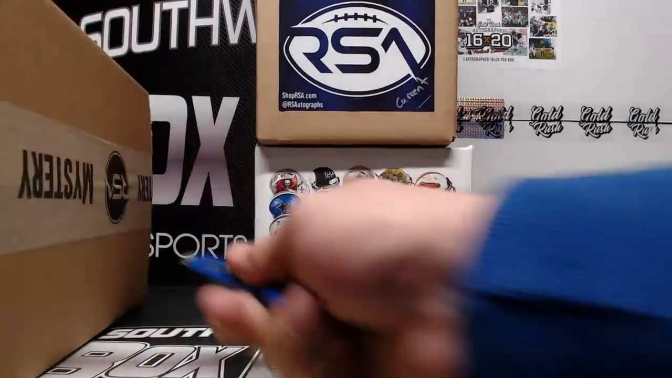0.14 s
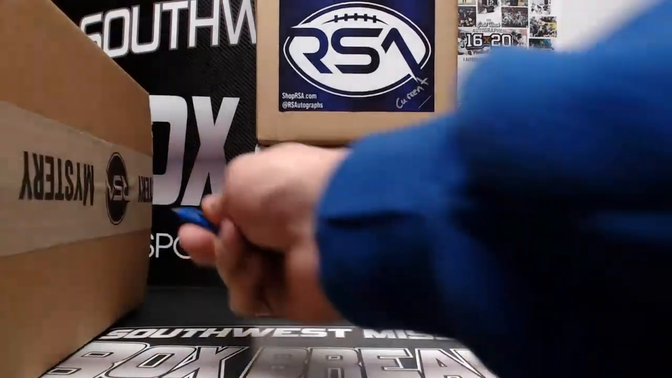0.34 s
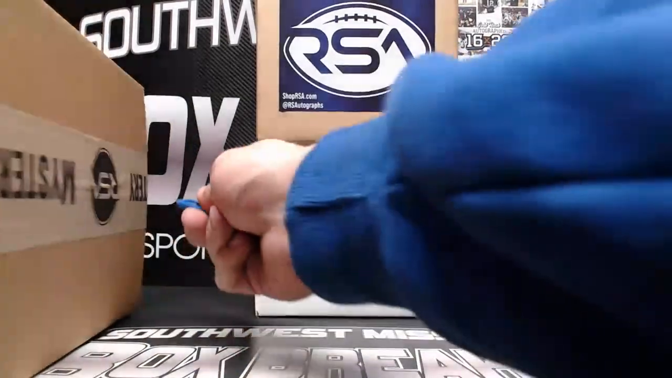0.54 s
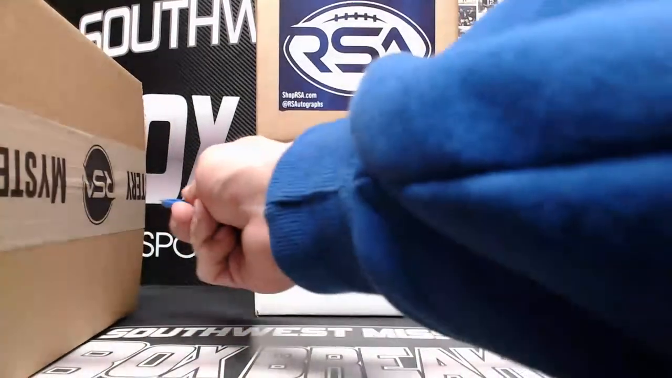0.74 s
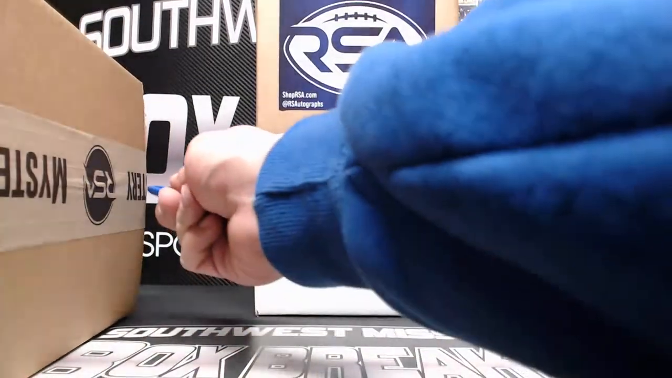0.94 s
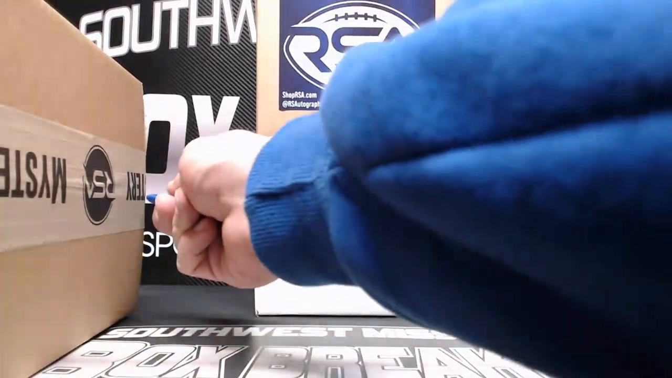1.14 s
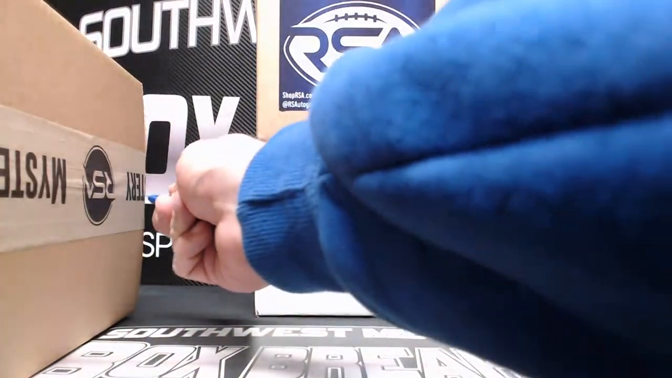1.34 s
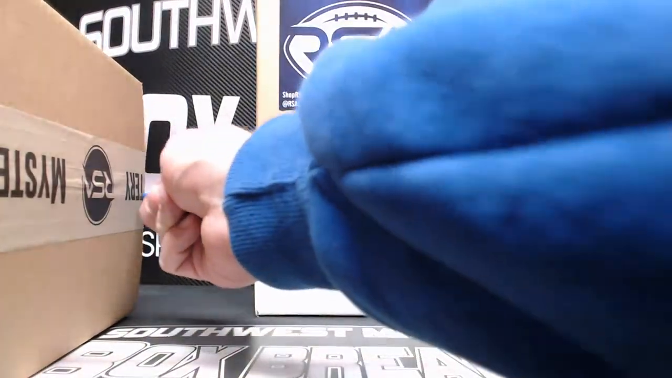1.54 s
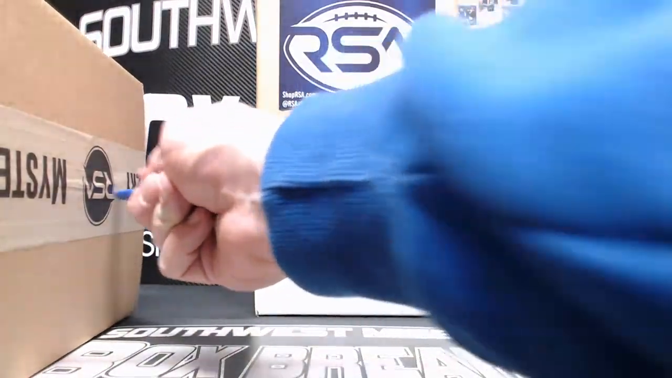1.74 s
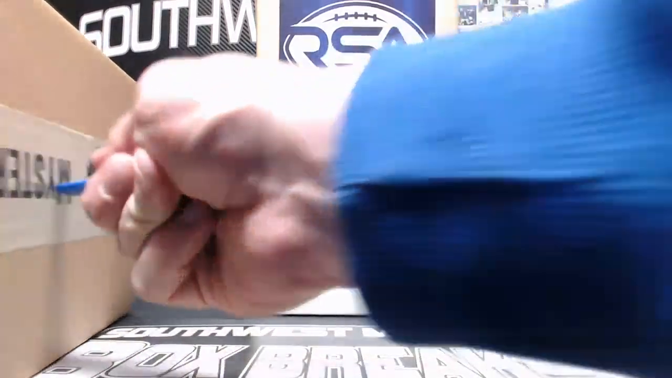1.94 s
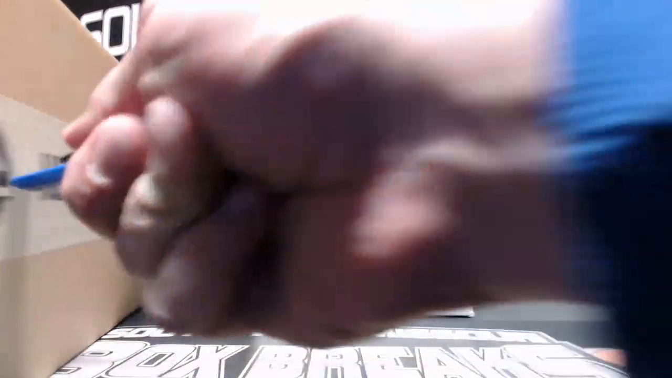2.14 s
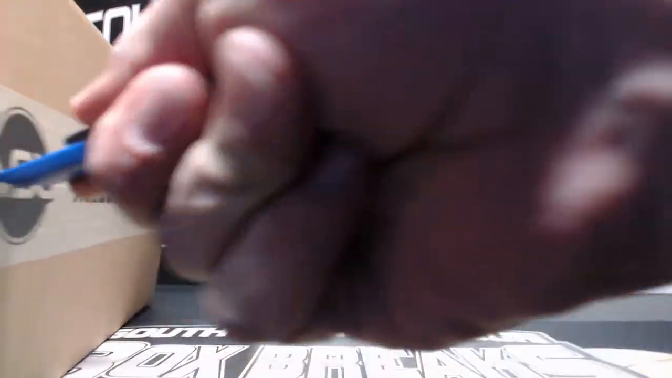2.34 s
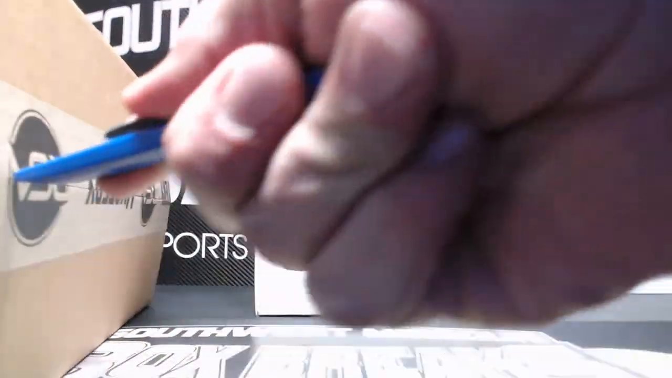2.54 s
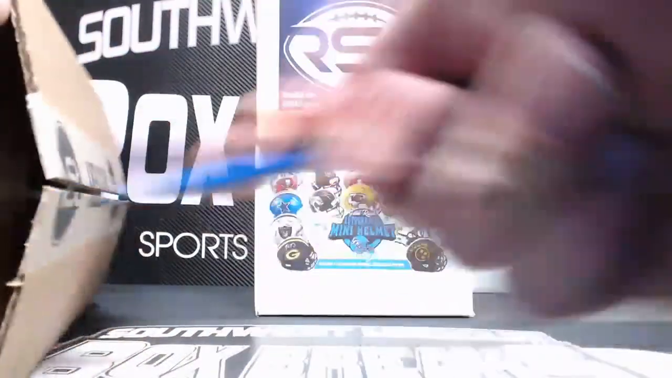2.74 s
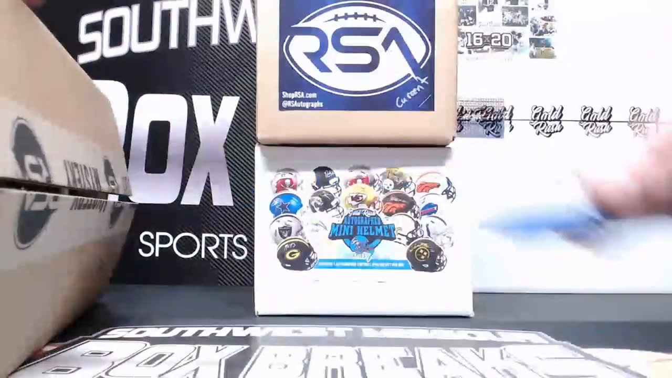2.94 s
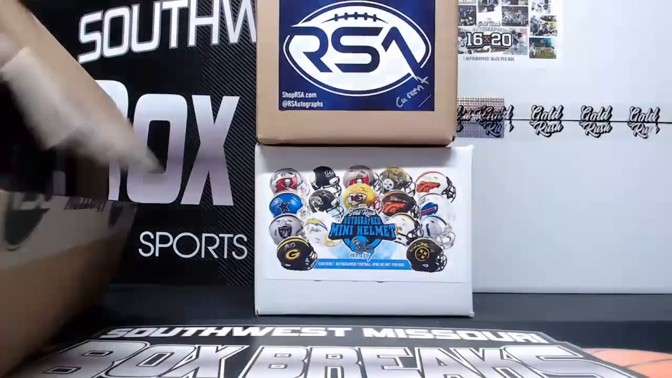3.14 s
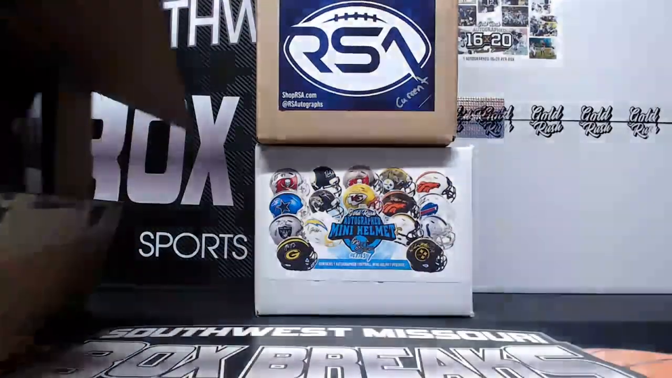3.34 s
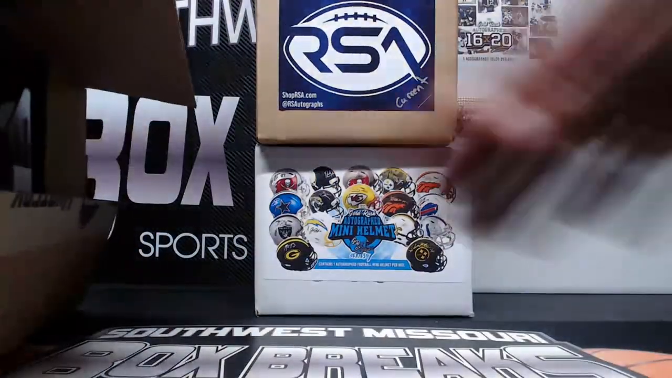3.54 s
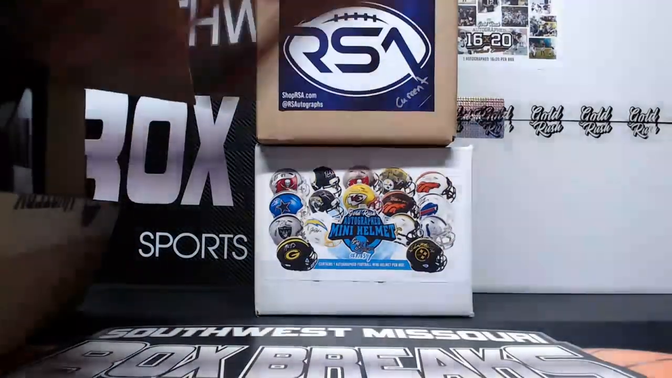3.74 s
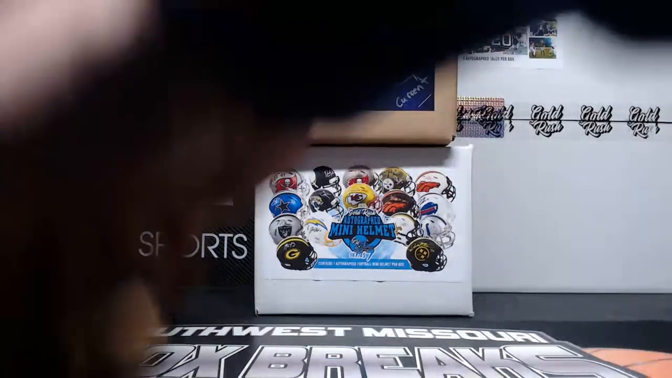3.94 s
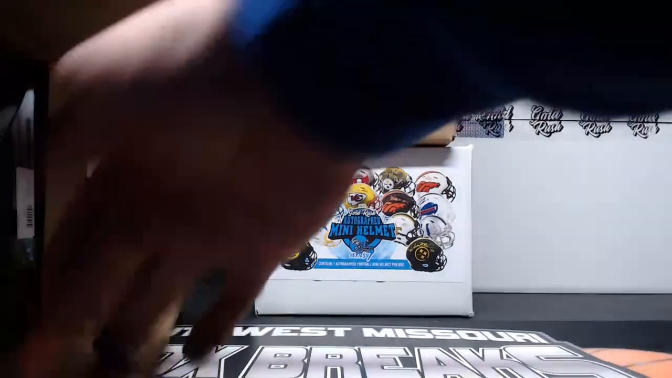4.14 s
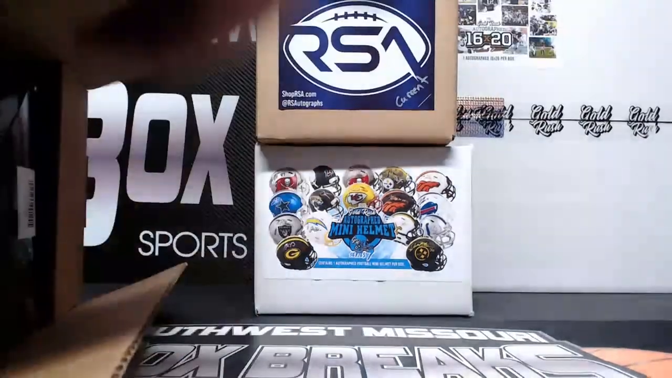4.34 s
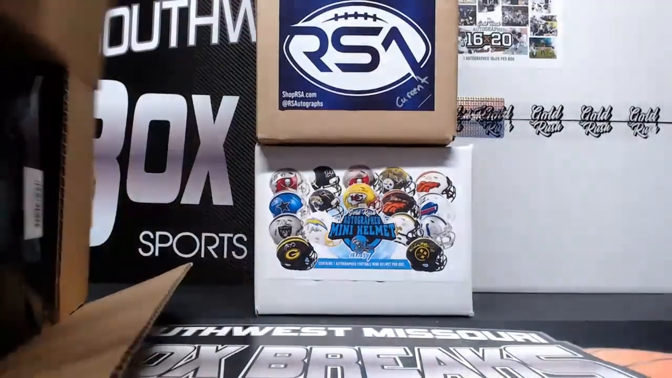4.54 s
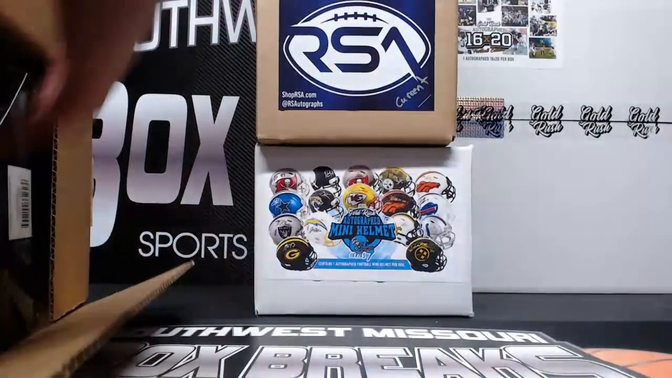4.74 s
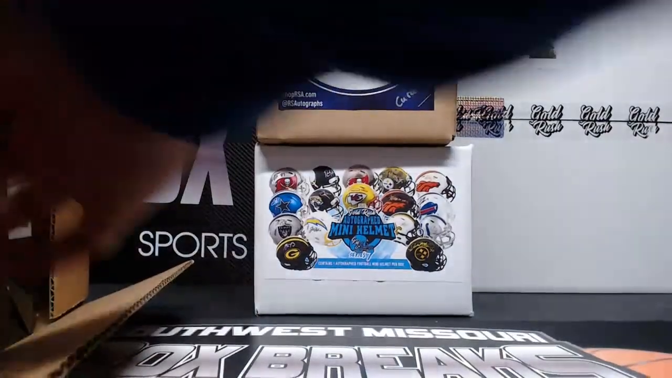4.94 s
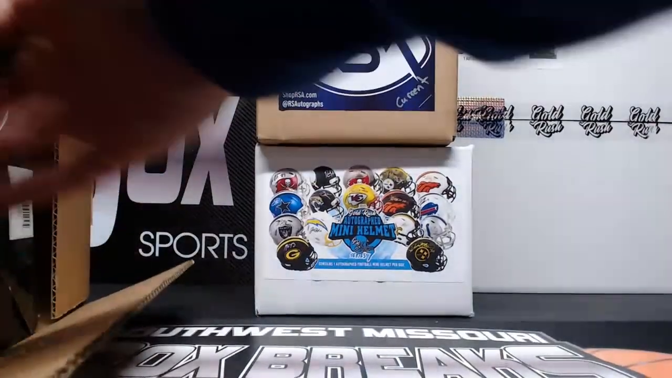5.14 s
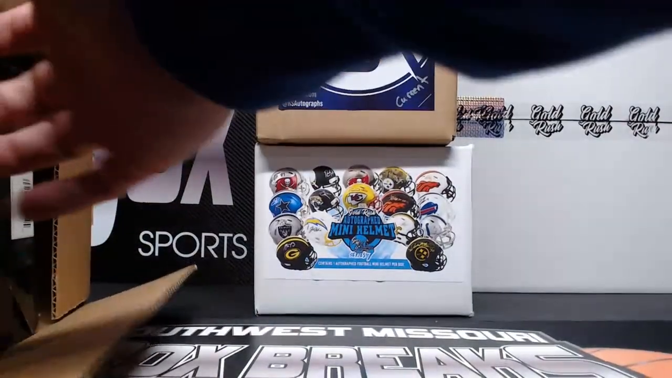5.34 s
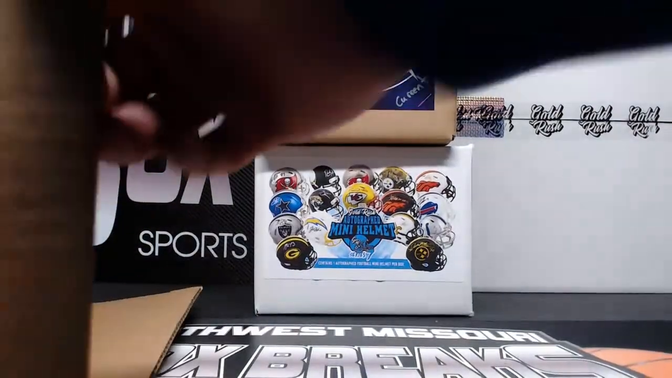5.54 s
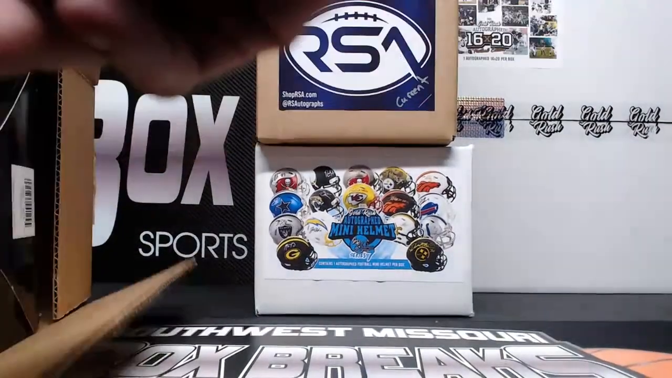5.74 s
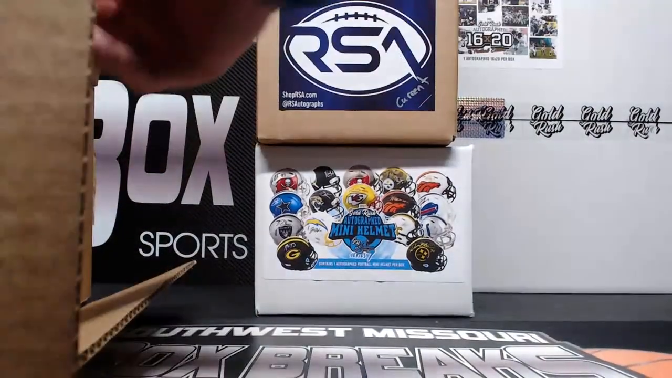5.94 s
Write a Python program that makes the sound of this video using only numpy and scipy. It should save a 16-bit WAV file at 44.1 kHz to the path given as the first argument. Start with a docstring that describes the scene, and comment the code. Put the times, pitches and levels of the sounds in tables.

```python
"""A blade slits the tape of an empty-sounding cardboard box close to a mono microphone; then hands pull the flaps open.
Blade and fingers are patchy noise in five layers: hiss, scrape, rasp, hollow and walls, driven by stroke curves.
Fibres and glue crack in short coloured bursts; knocks ring the hollow and thud in the walls.
Loose flaps ring as decaying sines, and some rubs make a panel sing as narrow noise.
The recorder's noise gate shuts in the pauses."""
import sys
import numpy as np
from scipy import signal
from scipy.fft import rfft, irfft, next_fast_len
from scipy.io import wavfile
from scipy.ndimage import uniform_filter1d, map_coordinates

SR = 44100
rng = np.random.default_rng(int(sys.argv[2]) if len(sys.argv) > 2 else 0)


def wav_out(sig):
    """Save sig, one row per channel (or a flat mono array), as 16-bit PCM at SR to the path in sys.argv[1]."""
    wavfile.write(sys.argv[1], SR, np.round(np.clip(np.atleast_2d(sig).T, -1, 1) * 32767).astype(np.int16))


N = 268288

# modes of the cardboard panels: (frequency [Hz], width [Hz], level [dB])
WALL_MODES = [(137.6, 71, -3.5), (209.8, 29.6, 6), (288.5, 80, 1.5), (513, 266, 0)]


def amp(db):
    """Gain of a level in dB."""
    return 10 ** (np.asarray(db) / 20)


def unit(x):
    """x at rms 1."""
    return x / np.sqrt(np.mean(x ** 2) + 1e-20)


def filtered(x, response):
    """x times a complex response of frequency."""
    m = next_fast_len(len(x) + SR // 4)
    spectrum = rfft(x, m) * response(np.fft.rfftfreq(m, 1 / SR))
    return irfft(spectrum, m)[:len(x)]


def colour(points):
    """Response through (Hz, dB) points on a log axis: cut below the first, level above the last."""
    f, db = np.transpose(points)
    return lambda hz: amp(np.interp(np.log(hz + 1), np.log(f + 1), db, left=-120))


def resonances(modes):
    """Causal response of (Hz, width in Hz, dB) modes, summed with alternating sign."""
    def response(f):
        total = 0
        for k, (centre, width, db) in enumerate(modes):
            damping = 1j * f * width
            total = total + (-1) ** k * amp(db) * damping / (centre * centre - f * f + damping)
        return total
    return response


def wobble(rate):
    """A smooth random curve, rate knots a second."""
    knots = rng.standard_normal(int(N * rate / SR) + 4)
    return map_coordinates(knots, [np.arange(N) * rate / SR])


def grit(lumps_db, lumps_rate, patchy_db):
    """Friction noise: uneven in strength, with patches of random gain over time and frequency."""
    z = signal.stft(rng.standard_normal(N + 1024), nperseg=512)[2]
    field = uniform_filter1d(rng.standard_normal(z.shape), size=3, axis=0)  # across frequency
    field = uniform_filter1d(field, size=14, axis=1)  # across time
    noise = signal.istft(z * amp(patchy_db * unit(field)), nperseg=512)[1][:N]
    return noise * amp(lumps_db * wobble(lumps_rate))


def swell_db(ms, rise, hold, fall):
    """Level curve of a brief sound: up to full level at 0 ms, held, then down, straight in dB."""
    fade_db = 20  # gained or lost over one rise or fall time
    return fade_db * np.minimum(0, np.minimum(ms / max(rise, 1), (hold - ms) / max(fall, 1)))


def singing():
    """Rubs that make one panel sing: friction noise caught in one resonance, swelling and fading."""
    # (start of full level [s], rise [ms], hold [ms], fall [ms], level [dB], centre [Hz],
    #  nominal width [Hz], reshaped by the filter below)
    sung_rubs = [(1.736, 69, 46, 25, -34, 2130, 200), (1.575, 12, 94, 100, -50, 4620, 360),
                 (1.605, 18, 160, 43, -48.5, 7600, 330), (4.76, 70, 42, 66, -44.5, 1030, 800),
                 (4.9, 100, 85, 15, -42, 1290, 460), (.08, 25, 70, 40, -44.5, 127, 34),
                 (5.02, 7.2, 26, 8, -31.5, 2080, 210), (5.678, 62, 21, 8, -21, 3160, 1400)]
    out = np.zeros(N)
    noise = grit(lumps_db=2, lumps_rate=80, patchy_db=1.5)
    ms = np.arange(N) / SR * 1000
    for s, rise, hold, fall, db, hz, width in sung_rubs:
        panel = resonances([(hz, 1.16 * width, 0)])
        tone = unit(filtered(noise, lambda f: panel(f) ** 2))
        out += amp(db + swell_db(ms - s * 1000, rise, hold, fall)) * tone
    return out


def flap():
    """Sharp knocks ring a loose flap's modes as decaying sines, each at a new strength and pitch."""
    # (time [s], level [dB] that scales the modes)
    hits = [(.127, -43), (.416, -50), (1.55, -38.5), (2.689, -23), (2.903, -27), (3.668, -24.5),
            (3.709, -33.5), (3.903, -33), (5.039, -25), (5.055, -27), (5.076, -16), (5.335, -21),
            (5.903, -16.5)]
    # modes of the flap before their random spread: (pitch [Hz], level [dB], 60 dB decay time [s])
    flap_modes = [(1404, -7.5, 0.06), (1937, 1.5, 0.033), (2287, 9.5, 0.015), (2940, -10, 0.025)]
    out = np.zeros(N + SR)
    t = np.arange(SR // 10) / SR
    for s, db in hits:
        ring = np.zeros(len(t))
        for hz, level, t60 in flap_modes:
            decay = amp(level + rng.normal(0, 1.5) - 60 * t / t60)
            ring += decay * np.sin(2 * np.pi * hz * rng.normal(1, 0.051) * t)
        onset = 1 - np.exp(-t / 0.0013)
        out[round(s * SR):][:len(t)] += amp(db) * onset * ring
    return out[:N]


def knocks():
    """Each knock rings the hollow for a few cycles, roughened by its neighbouring modes, and thuds in the walls."""
    # (time [s], ring level before make-up [dB], hollow pitch [Hz],
    #  wall thud over the ring level, before make-up [dB])
    blows = [(0.127, -22, 704, -20), (0.156, -28.5, 784, -20), (.181, -39, 790, -20),
             (0.336, -49.5, 262, -31.5), (0.402, -32.5, 264, -15), (0.416, -28, 585, -6),
             (0.426, -28, 202, -14), (1.18, -40, 654, -8), (1.55, -20.5, 750, -18), (1.674, -21, 656, -10),
             (1.97, -30.5, 730, 9), (2.083, -18, 514, 4), (2.182, -24, 750, -4), (2.318, -24, 750, -30),
             (2.348, -29, 684, 4), (2.642, -28.5, 750, -35), (2.689, -16.5, 734, -8.5),
             (2.903, -26, 723, -14), (3.372, -36, 567, 10), (3.482, -27.5, 744, -4), (3.521, -28, 670, -16),
             (3.563, -28.5, 554, 2), (3.606, -31.5, 570, -4), (3.667, -16.5, 712, -40),
             (3.711, -31.5, 680, -22), (3.734, -28.5, 605, -3), (3.773, -29, 680, -4),
             (3.783, -22.5, 642, -17), (4.284, -10.5, 570, -9), (4.296, -21, 450, -1),
             (4.354, -24.5, 674, -25), (4.493, -32.5, 552, -20), (4.987, -28, 605, 1),
             (4.999, -19, 717, 6.5), (5.039, -16, 760, -32), (5.054, -10, 708, -23),
             (5.074, -2, 709, -10.5), (5.2251, -17, 745, -13), (5.262, -26.5, 675, -23),
             (5.335, -13.5, 777, -10), (5.367, -27, 770, -4), (5.703, -20.5, 688, -5),
             (5.903, -17, 860, -7), (5.931, -30, 396, 10.5), (5.957, -32, 375, 6), (5.979, -42, 300, 5.5),
             (6.018, -47, 250, 8)]
    ring_makeup_db, thud_makeup_db = 2.5, 39
    ring, pushes = np.zeros(N + SR), np.zeros(N)
    t = np.arange(SR // 10) / SR
    for s, db, hz, thud_db in blows:
        onset = (1 - np.exp(-t * hz / .8)) ** 2
        # holds a few cycles, then the hand damps it; low notes last longer
        damping = amp(-60 * (t / 0.025 * (hz / 700) ** .6) ** 1.5)
        band = resonances([(hz, .6 * hz, 0)])
        rattle = unit(filtered(rng.standard_normal(len(t)), lambda f: band(f) ** 2))
        note = np.sin(2 * np.pi * hz * t) + 0.29 * rattle
        ring[round(s * SR):][:len(t)] += amp(db + ring_makeup_db) * 1.3 * onset * damping * note
        pushes[round(s * SR)] = amp(db + thud_db + thud_makeup_db)
    soft = lambda f: 1 / (1 + 1j * f / 600) ** 2  # a padded blow loses its treble
    free = lambda f: (1j * f / (1j * f + 70)) ** 3  # loose panels radiate little deep bass
    thuds = filtered(pushes, lambda f: resonances(WALL_MODES)(f) * soft(f))
    return filtered(ring[:N] + thuds, free)


def cracks():
    """Tape and fibres let go in noise bursts: a quick swell, a slower fall, a faint tail, a weaker second burst."""
    # (peak time [s], level before make-up and added bursts [dB], centre [Hz],
    #  nominal time to fall 10 dB [ms], held to 0.4-12)
    snaps = [(0.126, -36.5, 2200, 0.72), (1.567, -38.5, 10700, 0.71), (1.672, -30, 4070, 4.6),
             (1.703, -32.5, 2050, 6.8), (2.296, -32, 6900, 3.7), (2.4587, -29.5, 5130, 1.2),
             (2.4829, -29.5, 5200, 1.8), (2.5362, -36, 6840, 2.7), (2.562, -33, 2030, 2.8),
             (2.687, -22, 1750, 5.3), (2.83, -36, 6700, 0.93), (2.8526, -32.5, 8000, 1),
             (2.8618, -36, 7000, 1.2), (2.873, -41, 6000, 1), (2.8846, -35, 5000, 1.3),
             (2.893, -28.5, 5540, 1.1), (2.9025, -32, 5000, 1.5), (3.0045, -38, 10300, 2.3),
             (3.016, -30.5, 3760, 1.4), (3.0576, -28, 6550, 1.3), (3.1176, -20.5, 4150, 3.1),
             (3.1449, -21.5, 4700, 1.8), (3.1651, -21, 5950, 2.9), (3.1864, -19, 5060, 2.8),
             (3.2087, -23, 5650, 4.6), (3.304, -23, 4800, 1.7), (3.3144, -23, 5300, 0.55),
             (3.374, -25.5, 3930, 3.3), (3.671, -33, 2530, 7.1), (3.71, -36.5, 2210, 2.4),
             (3.9748, -24.5, 3680, 1.3), (4.116, -26.5, 6560, 1), (4.1465, -31.5, 6400, 2.7),
             (4.155, -28, 6400, 1.4), (4.161, -25.5, 6400, 1.2), (4.169, -26, 6360, 1.6),
             (4.1747, -35, 6400, 1.7), (4.222, -24.5, 6060, 0.43), (4.258, -27, 5050, 1.6),
             (4.2635, -28, 6100, 2.6), (4.27, -36, 3100, 1.5), (4.293, -27, 6300, 1.4),
             (4.305, -33, 6500, 1.3), (4.3258, -36, 5400, 1.2), (4.353, -29, 10900, 1.5),
             (4.4768, -36.5, 6260, 2.8), (5.0545, -19.5, 4540, 2.1), (5.0748, -20.5, 1730, 4.9),
             (5.316, -26, 6100, 1.1), (5.334, -24.5, 1900, 3.7), (5.3439, -27.5, 6500, 0.86),
             (5.3696, -21.5, 6400, 0.52), (5.7477, -30, 7540, 5.1), (5.896, -36, 5000, 1.5),
             (5.904, -22, 2330, 3.4), (5.932, -41, 5000, 2), (5.959, -44, 5530, 1.4),
             (5.98, -50, 6400, 1.5), (6.0746, -33.5, 1970, 2.6)]
    after_ms, after_db = 6.5, -14.5  # typical second burst, varied from crack to crack
    lead = SR // 100  # room for the swell ahead of the peak
    out = np.zeros(N + SR)
    ms = (np.arange(SR // 15) - lead) / SR * 1000
    for s, db, centre_hz, length in snaps:
        quicken = np.where(ms < 0, max(1, 3.6 / length), 1)  # short cracks start faster
        u = ms / np.clip(length, .4, 12) * quicken
        shape = amp(np.where(u < 0, -12 * abs(u) ** 1.96, -10 * abs(u) ** 1.7))
        shape = shape + (u > 0) * amp(-7 - 2.2 * abs(ms))  # faint tail
        # a weaker second burst follows, like a short echo, at a random delay and level
        level = rng.normal(after_db, 3)
        delay = after_ms * rng.uniform(0.52, 1.38)
        shape = shape + amp(level - 9 * ((ms - delay) / 1.06) ** 2)
        shape = shape + amp(6.5 - 3 * length - 40 * abs(ms))  # short cracks snap
        tone = resonances([(centre_hz, 0.52 * centre_hz, 0), (4500, 6000, -6),
                           (11000, 7000, -11), (1100, 1200, -17)])
        noise = rng.standard_normal(len(ms))
        burst = shape * unit(filtered(noise, lambda f: tone(f) * f / (f + 600)))
        out[round(s * SR):][:len(ms)] += amp(db + 0.5) * burst
    return out[lead:N + lead]


def fibres():
    """Single fibres snapping under the edge: sparse clicks of uneven size."""
    per_second, level_db, spread_db = 500, 5, 4.5
    hit, size, sign = rng.random((3, N))
    height = amp(level_db - spread_db * np.log(size + .05))
    return (hit < per_second / SR) * height * np.sign(sign - .5)


def layers_db(scrape, shake, hiss_db, rasp_db, walls_db):
    """Levels of hiss, scrape, rasp, hollow and walls from a stroke's scraping and its shaking of the box."""
    # finer when the edge glides without shaking the box
    hiss = scrape - 3.5 + hiss_db + 0.2 * np.clip(scrape - shake, -25, 12)
    # rasp lies between scrape and shake
    rasp = scrape + 0.27 * (shake - scrape) - 3.5 + rasp_db
    return np.array([hiss, scrape, rasp, shake, shake + walls_db])


def strokes():
    """Gain per sample of the five layers: long strokes follow their curves, brief sounds rise, hold and fall."""
    # one table per long stroke: first touch, blade slid out, blade feeling for the seam, the cut,
    # first flap lifted, other flaps handled, a flap torn free, the box settling
    # (time [s], scrape of the edge on paper [dB], shake of the box [dB],
    #  extra rasp where the edge crosses the ridges [dB])
    long_strokes = [
        [(0, -49.5, -43, -1.5), (.041, -53, -55, -1), (.075, -60, -44.5, 0), (.133, -53.5, -50, 3),
         (.19, -62, -57, -1), (.215, -83, -58.5, 4), (.29, -88, -100, 4)],
        [(.4, -74, -68, 5), (.457, -62, -61, 4), (.6, -49, -57, -9), (.676, -53, -58.5, -1),
         (.74, -63, -70, -1), (.79, -101, -87, 3)],
        [(1.176, -56.5, -44, 4), (1.22, -74.5, -51.5, -7), (1.267, -63.5, -49, -6), (1.3, -90, -77, -6),
         (1.325, -64, -56.5, -12), (1.36, -85, -49.5, -15), (1.4, -93, -77, -7), (1.44, -100, -102, 0)],
        [(1.547, -49.5, -38.5, 6), (1.595, -49, -38, -4.5), (1.675, -45.5, -33, 1), (1.779, -37, -32.5, 5.5),
         (1.811, -41, -29.5, 4), (1.971, -38.5, -34, 2), (2.027, -36, -24.5, 0), (2.123, -37.5, -35, 0.5),
         (2.211, -35.5, -27, -2), (2.3, -38, -32, 0), (2.388, -38, -31, -6), (2.46, -48.5, -39.5, -1),
         (2.588, -43, -35, -3.5), (2.684, -31.5, -28.5, -0.5), (2.78, -48.5, -45, -3.5)],
        [(2.78, -43.5, -55.5, -5), (2.874, -51.5, -51.5, 12.5), (3.04, -53.5, -58, -2), (3.12, -45, -53, -6),
         (3.175, -66, -59, -2), (3.215, -42, -55, 0), (3.295, -44, -52.5, -4.5), (3.44, -50.5, -51.5, 4),
         (3.617, -55, -49.5, 6), (3.649, -64, -52, 5), (3.69, -52.5, -47.5, -2), (3.77, -58.5, -47.5, 12),
         (3.95, -74, -63, 8)],
        [(4.04, -48, -43, 2), (4.099, -58.5, -49.5, 5), (4.21, -66, -58, 6), (4.235, -48, -59, -6),
         (4.28, -78, -59, 16), (4.372, -52, -52, 2), (4.598, -70, -64.5, 11), (4.719, -49, -48, 2.5),
         (4.84, -57.5, -54.5, 4), (4.896, -56, -41.5, 12), (4.985, -55.5, -48.5, 6), (5.137, -67, -46.5, 13),
         (5.222, -62.5, -63, -6), (5.269, -53.5, -45, 11.5), (5.297, -84, -64, -3)],
        [(5.297, -48, -38, 5), (5.329, -37, -32.5, -10), (5.354, -47.5, -37.5, 3.5), (5.435, -23, -18, -2),
         (5.508, -22, -22, -2.5), (5.6, -22.5, -32, -3.5), (5.669, -22, -40, 1.5), (5.71, -23.5, -21, 6)],
        [(5.71, -35.5, -33.5, 2), (5.832, -45.5, -47, 6), (5.893, -46, -45.5, 6), (5.98, -68, -54, 14),
         (6.057, -102, -74, -5), (6.083, -29.5, -33, 3)],
    ]
    # colour of each long stroke: (extra hiss [dB], walls over the shake [dB])
    stroke_colours = [(6.5, -2), (8, -13), (4.5, -2.5), (2.5, -4.5), (-2.5, 8), (0, 6), (3, -13), (-1.5, 3)]
    # brief brushes, and a few soft thumps on the box:
    # (start of full level [s], rise [ms], hold [ms], fall [ms],
    #  scrape [dB], shake [dB], walls over the shake [dB])
    brushes_and_thumps = [(.075, 23, 60, 43, -82, -54.5, 16.5), (0.409, 5.2, 12, 91, -57.5, -56, 21),
                          (0.973, 11.4, 6.9, 23, -71.5, -44, -2), (1.03, 3.3, 17, 24, -103, -42.5, -14),
                          (1.05, 8.1, 2.1, 32, -61.5, -41, -12), (2.906, 14, 3, 53, -38, -39.5, -20),
                          (3.01, 14, 2.2, 13, -43, -53.5, 10), (3.058, 9.3, 20, 70, -37, -39.5, -9),
                          (3.386, 15, 3, 49, -43, -42, 10), (3.776, 2.5, 6.7, 97, -41.5, -31.5, -2),
                          (3.848, 60, 3.7, 36, -39, -64, 5), (3.9, 11, 3.7, 19, -45, -41.5, -9),
                          (3.953, 3.5, 17, 81, -37.5, -33, -4), (3.976, 2, 60, 3.5, -32.5, -46, -1),
                          (4.166, 54, 3, 44, -44.5, -57, 8), (4.286, 1.4, 5, 86, -42, -34.5, 10),
                          (4.447, 21, 4.1, 16, -34, -53, -4), (4.501, 28, 3, 65, -42.5, -43.5, 5),
                          (4.636, 18, 2.3, 25, -47.5, -45.5, 2), (4.987, 2.4, 3.3, 26, -70, -31.5, 8),
                          (5.015, 1.7, 24, 2.4, -30.5, -47, 12), (5.087, 51, 3.6, 37, -35, -22, -2),
                          (5.225, 3.8, 3.7, 51, -54.5, -33.5, 7), (5.703, 100, 9.1, 17, -35, -49, 18),
                          (5.895, 2.4, 3.8, 87, -52, -31, 6.5)]
    t, gains = np.arange(N) / SR, np.zeros((5, N))
    for rows, (hiss_db, walls_db) in zip(long_strokes, stroke_colours):
        s, *cols = np.transpose(rows)
        on = (t >= s[0]) & (t < s[-1])
        scrape, shake, rasp_db = [np.interp(t[on], s, c) for c in cols]
        gains[:, on] += amp(layers_db(scrape, shake, hiss_db, rasp_db, walls_db))
    for s, rise, hold, fall, scrape, shake, walls_db in brushes_and_thumps:
        on = abs(t - s) < .5
        shape_db = swell_db((t[on] - s) * 1000, rise, hold, fall)
        gains[:, on] += amp(layers_db(scrape, shake, 0, 0, walls_db)[:, None] + shape_db)
    gains[4] *= amp(2 * wobble(14))  # the walls' share drifts as the grip shifts
    return uniform_filter1d(gains, size=64, axis=1)


def rubbing():
    """Blade and fingers hiss, scrape and rasp on the board and shake the hollow and the walls in fits."""
    # modes of the air in the box, before the drift: (frequency [Hz], width [Hz], level [dB])
    air_modes = [(590, 120, -10), (700, 70, -3), (775, 75, 0)]
    # table and handling, a colour laid over the wall modes: (frequency [Hz], level [dB])
    rumble_curve = [(20, -64.5), (60, -6), (100, -12.5), (125, -3), (400, -6.5), (1000, -13), (1500, -25.5)]
    # finest fibres, relative spectrum: (frequency [Hz], level [dB])
    hiss_curve = [(6500, -48), (7800, -4), (9500, 0), (12000, -2.5), (15400, -7.5), (16000, -9)]
    # edge on paper, relative spectrum: (frequency [Hz], level [dB])
    scrape_curve = [(2200, -22), (2900, 2), (4000, 2.5), (5500, 2), (7200, 2), (7900, -22), (9500, -63)]
    # ridges of the board, with a flap ringing near 2.2 kHz, relative: (frequency [Hz], level [dB])
    rasp_curve = [(800, -9), (1100, -4.5), (1850, -1), (2170, 1), (2450, -2), (3000, -11.5), (4000, -29)]
    # hiss and scrape share the same catches
    catch = grit(lumps_db=1.83, lumps_rate=250, patchy_db=3.5) + fibres()
    ridges = grit(lumps_db=3, lumps_rate=150, patchy_db=2.5) + fibres()
    air = grit(lumps_db=1.5, lumps_rate=100, patchy_db=1.5)
    panels = grit(lumps_db=3.5, lumps_rate=50, patchy_db=2.0)

    # little of the hollow passes above its modes
    steep = lambda f: resonances(air_modes)(f) / (1 + (f / 1000) ** 6)
    # the hollow drifts between a raised and a lowered pitch as the seam and flaps gape
    shift = 1.05  # pitch ratio, up and down
    gape = np.sin(np.pi / 4 * (1 + np.tanh(wobble(8))))
    raised = filtered(air, lambda f: steep(f / shift))
    lowered = filtered(air[::-1], lambda f: steep(f * shift))  # reversed noise, so the two differ

    hiss = filtered(catch, colour(hiss_curve))
    scrape = filtered(catch, colour(scrape_curve))
    rasp = filtered(ridges, colour(rasp_curve))
    hollow = gape * raised + np.sqrt(1 - gape ** 2) * lowered
    walls = filtered(panels, lambda f: resonances(WALL_MODES)(f) * colour(rumble_curve)(f))
    layers = [hiss, scrape, rasp, hollow, walls]
    return sum(gain * unit(layer) for gain, layer in zip(strokes(), layers))


def scene():
    """One microphone, the same in both channels."""
    return np.tile(rubbing() + cracks() + knocks() + flap() + singing(), (2, 1))


def record(dry):
    """A noise gate pulls quiet moments down further, peaks are rounded, the top is cut steeply at the band limit."""
    top_hz = 16000
    level_db = 10 * np.log10(np.abs(uniform_filter1d(dry[0] ** 2, size=600)) + 1e-14)
    gated = dry[0] * amp(np.minimum(0, 1.4 * (level_db + 78.0)))  # acts below -78 dB
    rounded = gated / (1 + np.abs(gated / .85) ** 4) ** (1 / 4)
    return np.tile(filtered(rounded, lambda hz: 1 / (1 + (hz / top_hz) ** 160)), (2, 1))


dry = scene()
out = record(dry)
wav_out(out)
```